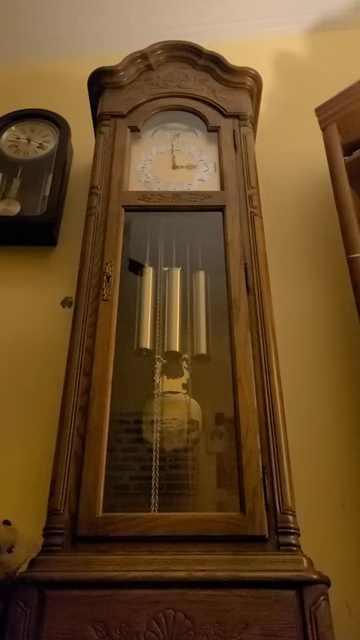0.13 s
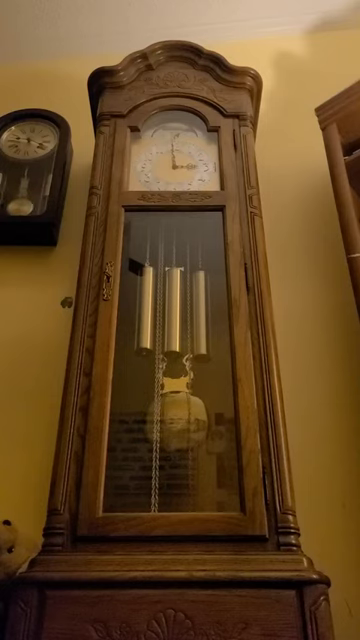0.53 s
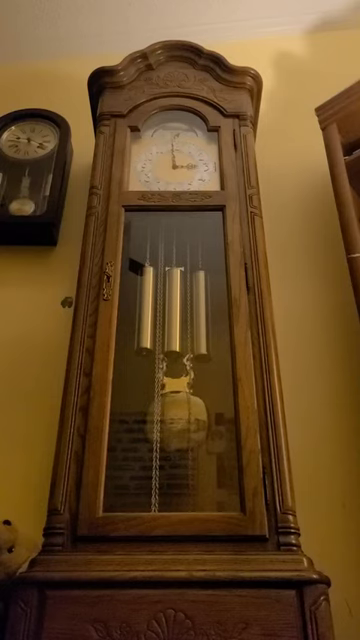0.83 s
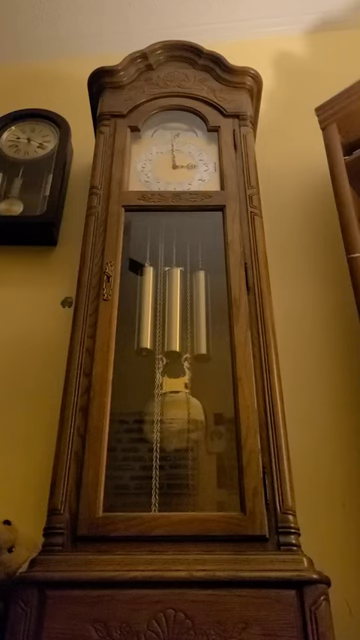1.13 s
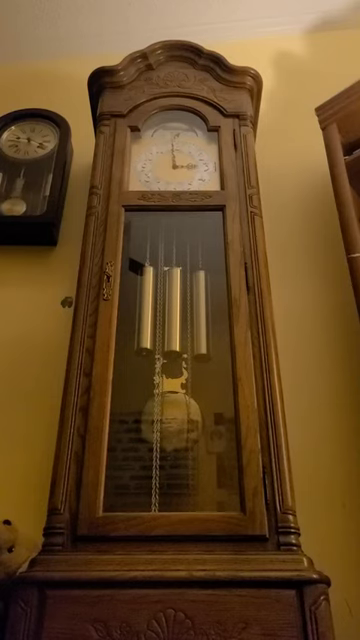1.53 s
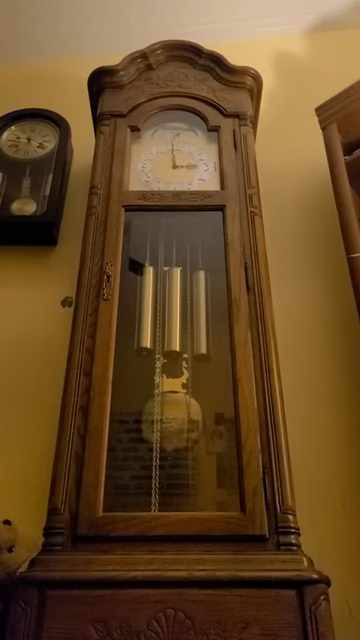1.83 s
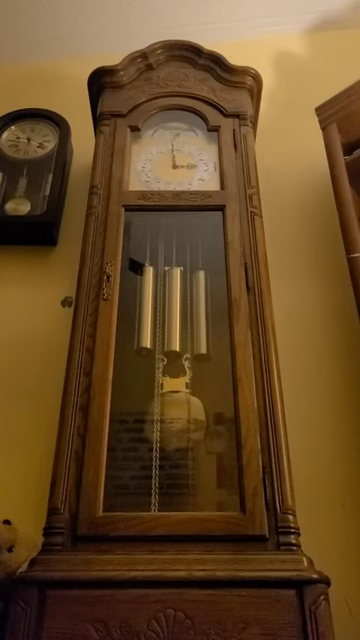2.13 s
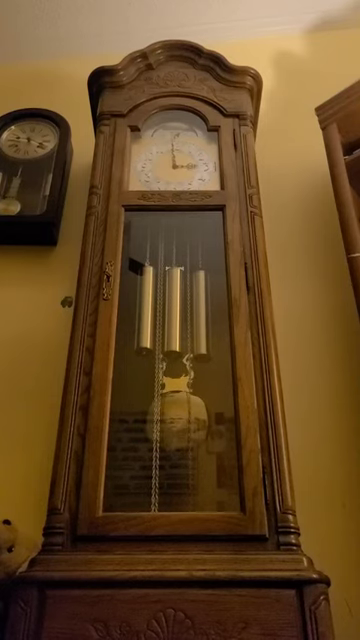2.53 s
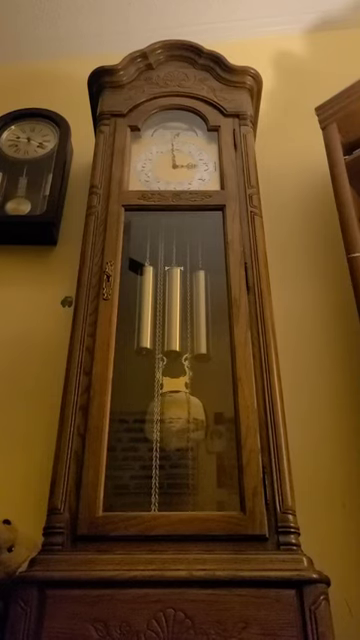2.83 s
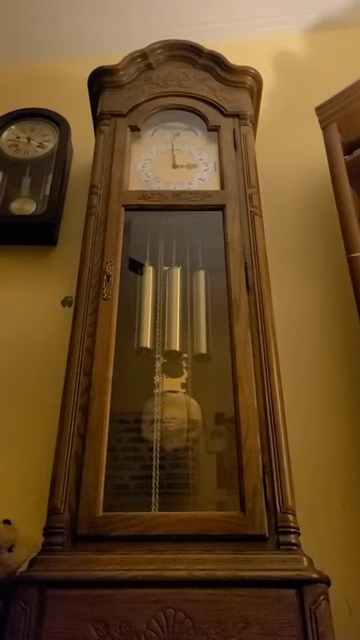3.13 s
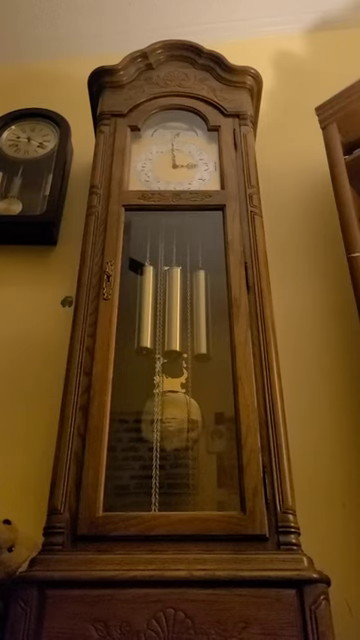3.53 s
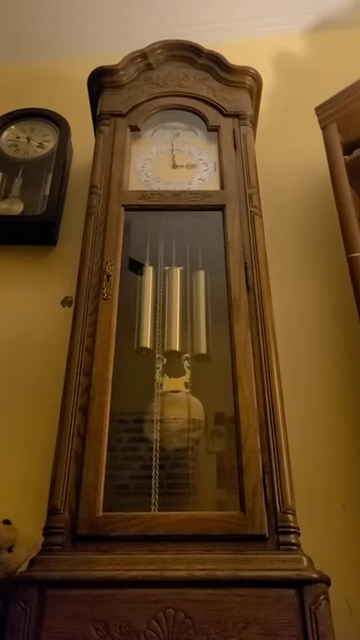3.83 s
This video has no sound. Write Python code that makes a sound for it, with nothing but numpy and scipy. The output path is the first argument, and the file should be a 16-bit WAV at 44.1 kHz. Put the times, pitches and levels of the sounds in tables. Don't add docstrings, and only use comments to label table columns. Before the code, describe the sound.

A longcase clock beats slowly in a quiet living room: ticks at about 0.1, 1.3, 2.5 and 3.65 seconds, tocks at 0.65, 1.85 and 3.0. Each is a crisp woody, brassy clack with short room echo; later ticks ring slightly. Very faint other clocks tick irregularly between. Low ventilation rumble continues. Around 3.25 to 3.46, small dry finger clicks and a soft low thump touch the phone.

```python
import sys
import numpy as np
from scipy import signal
from scipy.fft import rfft, irfft, next_fast_len
from scipy.io import wavfile
from scipy.ndimage import uniform_filter1d

SR = 44100
rng = np.random.default_rng(int(sys.argv[2]) if len(sys.argv) > 2 else 0)


def invert_db(x):
    u = np.asarray(x, float) / 20
    return 10 ** u


def file_out(sig):
    cols = np.atleast_2d(sig).T
    lim = np.clip(cols, -1, 1)
    pcm = np.round(lim * 32767).astype(np.int16)
    wavfile.write(sys.argv[1], SR, pcm)


N = 175077

# [frequency_hz, density_db]
RUMBLE_SPECTRUM = [(11, -20), (18, -11), (107, -5), (184, -16), (337, -22.5), (445, -23.5), (475, -26),
                   (752, -31.5), (900, -39), (1170, -102), (1980, -120)]
HISS_SPECTRUM = [(600, -29), (900, -8.5), (1300, -6.5), (2900, -7.5), (4200, -15), (7600, -24),
                 (12000, -24.5), (15500, -17)]
RUMBLE_DB, HISS_DB = -47.5, -74.5
# [frequency_hz, width_hz, gain_db]
ROOM_RESONANCES = [(47.3, 2.9, 3), (67.7, 13.4, 7.5), (107, 3.5, 7.5), (175, 32, 3.5), (219.9, 3.6, 16),
                   (252, 12, 2.5), (352, 6.2, 7.5), (444.6, 4.1, 6.5), (734, 6.3, 7), (1288, 11, 14)]
# [frequency_hz, likeness_0_to_1]
PORT_LIKENESS = [(130, 0.99), (290, 0.89), (600, 0.5), (1400, 0.047)]
# [frequency_hz, difference_db]
PORT_BALANCE = [(100, -2.5), (220, -1.5), (500, -3.5), (1300, -5.5), (3000, -0.5), (8000, 4)]
# [frequency_hz, lead_rad]
PORT_LEAD = [(130, 0), (300, .25), (500, .4), (800, 1.2)]

# [frequency_hz, t60_s]
ROOM_T60 = [(1000, 0.46), (2000, 0.32), (4000, 0.26), (8000, 0.32), (14000, 0.2)]
ROOM_DB, ROOM_FILL_S, ECHO_LIKENESS = 6, 0.0065, .3
CLOCK_PAN_DB, RIGHT_LAG_SAMPLES = -4.5, 4

# [start_s, level_db, dial_ring_db, panel_ring_db, low_case_db]
BEATS = [
    (.1030, -31.5, -1.5, 1, 2),
    (.6628, -33, -2.5, -0.5, 0),
    (1.2875, -31.5, 7, -3.5, 0.5),
    (1.8442, -33.5, -6, 0, 4.5),
    (2.4700, -31, 5.5, -3, 3),
    (3.0278, -33.5, -17, -3.5, 4),
    (3.6505, -31, 7.5, -5, 3),
]
# [frequency_hz, level_db, t60_s]
TICK_PLATES = [(1911, -5, .1), (2120, -5, .12), (2377, -10, .1), (2525, -9, .1), (2660, -9, .1),
               (2878, -6, .1), (3074, -8, .12), (3138, -9, .1), (3300, -7, .1), (3569, -8, .1),
               (4700, -14, .12), (4940, -20, .1)]
TOCK_PLATES = [(1550, -12, .06), (2008, -5, .1), (2240, -4, .12), (2476, -5, .1), (2640, -5, .1),
               (2799, -4, .1), (2945, -1, .1), (3060, -4, .1), (3265, -6, .1), (3510, -8, .1),
               (3714, -10, .1), (4646, -15, .1)]
PLATES_DB, PLATES_T60_SCALE = -19, .6
# [frequency_hz, width_hz, level_db]
CASE = [(1479, 940, -12), (2097, 580, -8), (2857, 650, 1), (3220, 1100, -0.5), (4900, 1280, -6),
        (5970, 2700, -13.5), (8100, 940, -23.5), (9480, 870, -38), (11600, 2000, -26.5), (13600, 1300, -28),
        (14050, 1400, -29)]
# [frequency_hz, level_db, swell_s, t60_s]
DIAL = [(1596.4, 0, 0.006, 0.25), (1618, -7.5, 0.0046, 0.29), (1590, -13.5, 0.037, 0.43)]
DIAL_NEAR_DB, DIAL_ROOM_DB, DIAL_WOBBLE = 8, -8.5, .3
# [frequency_hz, level_db, swell_s, t60_s]
TICK_PANELS = [(1912, -25.5, 0.0047, 0.11), (2086, -16, 0.037, 0.24), (2605, -20, 0.025, .25),
               (2940, -32, 0.036, 0.33), (2994, -22, 0.0038, 0.44), (3077, -14.5, 0.006, 0.39),
               (3193, -11, 0.02, 0.24), (3340, -19, 0.0043, .27), (3540, -12.5, 0.0029, 0.13),
               (4750, -23.5, 0.0022, .25), (4880, -14, 0.00091, .035)]
TOCK_PANELS = [(1176, -23, 0.034, 0.17), (1557, -17, 0.0025, 0.16), (2018, -27, 0.0062, 0.31),
               (2210, -15, 0.0049, 0.28), (2220, -16.5, 0.02, .28), (2470, -19, 0.024, 0.32),
               (2664, -3, 0.023, .2), (2790, -16, 0.007, 0.32), (2853, -8.5, 0.00085, 0.24),
               (2938, -16.5, 0.0012, 0.36), (3015, -11, 0.0012, 0.3), (3560, -17.5, 0.0045, 0.25),
               (4900, -11.5, 0.0009, 0.026), (4640, -25.5, 0.013, 0.43)]
PANEL_WOBBLE, WOBBLE_S = .85, .008
UNLOCK_S, UNLOCK_DB = .009, -2
RATTLE_S, RATTLE_DB = 0.016, -2
DROP_S, TICK_DROP_DB, TOCK_DROP_DB = .0012, 9, 14
TICK_TOP_DB, TOCK_TOP_DB = 0, 3

# [start_s, level_db]
WALL_KNOCKS = [
    (0.254, -56.5),
    (1.038, -61),
    (1.461, -61),
    (2.256, -56),
    (2.657, -64),
    (3.445, -61.5),
    (3.849, -58.5),
]
# [frequency_hz, level_db, swell_s, t60_s]
WALL_PANELS = [(1175, 5, .002, .06), (1555, 0, .006, .07)]
WALL_LATE_S, WALL_ROOM_DB = .008, -4
# [start_s, level_db, pitch_hz]
MANTEL_BEATS = [
    (0.297, -56.5, 6170),
    (0.607, -47.5, 4550),
    (1.6, -58, 5000),
    (2.289, -61, 6070),
    (3.284, -59, 6050),
    (3.605, -55.5, 4900),
]
# [start_s, level_db]
QUARTZ_STEPS = [
    (0.9541, -57),
    (1.959, -63.5),
    (2.9659, -54.5),
    (3.9604, -56),
]
# [frequency_hz, level_db, t60_s]
QUARTZ_MODES = [(1410, -18, 0.02), (1780, -5, 0.016), (3050, 0.5, 0.005), (4650, -6, 0.013),
                (5870, -16.5, 0.024), (8100, -7.5, 0.004), (11400, -11, 0.0037)]
FAR_DIRECT_DB = -7

# [start_s, level_db, pitch_hz]
THUMPS = [
    (3.249, -50, 182),
    (3.2785, -47, 170),
    (3.402, -49, 169),
    (3.4535, -31.5, 83),
]
THUMP_CYCLES, THUMP_SAG, THUMP_LEFT = 0.82, 0.091, 0.52
# [start_s, level_db, left_minus_right_db, treble_db]
CLICKS = [
    (3.25, -56, -7, 3),
    (3.2522, -46, -13.5, 5),
    (3.28, -43, -10, -0.5),
    (3.4010, -59, -13, -10),
    (3.4475, -63, -18, -2),
    (3.4486, -52.5, -13, 2),
    (3.452, -52, -12, -1),
    (3.4582, -41, -18, 3),
    (3.46, -48.5, -11.5, 7.5),
]
# [frequency_hz, level_db, t60_s]
CLICK_MODES = [(1020, 0, 0.006), (1370, -5.5, 0.0086), (2750, 2.5, 0.0018), (5000, 9, 0.00059),
               (6800, -20, 0.0024), (12000, -5.5, .001)]
# [frequency_hz, level_db, t60_s]
SHELL = [(760, 3, 0.0078), (383, 1, .012)]

# [frequency_hz, width_hz, gain_db]
PORT_DIPS = [(3930, 790, -1.5), (7300, 440, -5), (9500, 1700, -1)]
START_S, FADE_S, TOP_HZ = 0.0922, 0.0021, 15500


def curve(table, hz):
    points = np.array(table)
    return np.interp(np.log(np.maximum(hz, 1)), np.log(points[:, 0]), points[:, 1])


def add(track, sound, s):
    i = int(s * SR)
    track[..., i:i + sound.shape[-1]] += sound[..., :track.shape[-1] - i]


def band(x, hz, width):
    b, a = signal.iirpeak(hz, hz / width, fs=SR)
    return signal.lfilter(b, a, signal.lfilter(b, a, x))


def walk(rate):
    k = int(SR / rate)
    held = np.repeat(rng.standard_normal(N // k + 1), k)
    return 1.8 * uniform_filter1d(uniform_filter1d(held, k), k)[:N]


def ventilation(shape, db, resonances, swell_db, flicker_db):
    size = next_fast_len(N)
    f = np.arange(size // 2 + 1) * SR / size
    boost = sum((invert_db(d) - 1) / (1 + ((f - hz) / w * 2) ** 2) for hz, w, d in resonances)
    gain = invert_db(curve(shape, f)) * (1 + boost)
    alike = np.clip(curve(PORT_LIKENESS, f), 0, 1)
    sign = np.array([[1], [-1]])
    mid, side = rfft(rng.standard_normal((2, size)))
    both = gain * (mid * np.sqrt(1 + alike) + sign * side * np.sqrt(1 - alike))
    both = both * invert_db(sign * curve(PORT_BALANCE, f) / 2) * np.exp(.5j * sign * curve(PORT_LEAD, f))
    out, swell = 0, walk(2.44)
    for hz in 20 * 2 ** np.arange(10):
        octaves_away = np.clip(np.log2(np.maximum(f, 1) / hz), -1, 1)
        share = np.cos(np.pi / 2 * octaves_away) ** 2
        if np.any(share * gain > 1e-4):
            level = invert_db(swell_db * swell + flicker_db * walk(5.706))
            out = out + irfft(both * share, size)[:, :N] * level
    return out * invert_db(db) / np.sqrt(np.mean(out.mean(axis=0) ** 2))


def room(x):
    t, echo = np.arange(SR // 2) / SR, 0
    mid, side = rng.standard_normal((2, len(t)))
    sign = np.array([[1], [-1]])
    air = np.sqrt(1 + ECHO_LIKENESS) * mid + np.sqrt(1 - ECHO_LIKENESS) * side * sign
    for k, hz in enumerate(700 * 2 ** np.arange(0, 4.6, .5)):
        decay = 1000. ** (-t / curve(ROOM_T60, hz))
        echo = echo + (-1) ** k * band(air, hz, hz / 2) * decay
    echo = echo * (1 - np.exp(-t / ROOM_FILL_S))
    return signal.fftconvolve(x[None], echo / np.sqrt(np.sum(echo ** 2) / 2), axes=1)


def ring(modes, scatter_db=2, size=13230):
    hz, db, t60 = np.array(modes, float).T[:, :, None]
    level_luck, pitch_luck = rng.standard_normal((2, len(modes), 1))
    t = np.arange(size) / SR
    sines = np.sin(2 * np.pi * hz * (1 + 0.0026 * pitch_luck) * t)
    return np.sum(invert_db(db + scatter_db * level_luck) * sines * 1000. ** (-t / t60), axis=0)


def panels(table, wobble=PANEL_WOBBLE):
    hz, db, swell, t60 = np.array(table, float).T[:, :, None]
    t, k = np.arange(13230) / SR, int(WOBBLE_S * SR)
    luck = rng.standard_normal((2, 2, len(table), len(t)))
    waver = uniform_filter1d(uniform_filter1d(luck, k), k) * np.sqrt(.75 * k)
    carrier = (1 + wobble * (waver[0] + 1j * waver[1])) * np.exp(2j * np.pi * hz * t)
    envelope = (1 - np.exp(-t / np.abs(swell))) * 1000. ** (-t / t60)
    return np.sum(invert_db(db) * envelope * carrier.imag, axis=1)


def case_filter(impacts, low_db, top_db):
    out = 0
    for hz, width, db in CASE:
        gain = invert_db(db + low_db * (hz < 2500) + top_db * (hz > 9000)) / np.sqrt(width / 1000)
        out = out + gain * band(band(impacts, hz, width), hz, width)
    return out


def longcase():
    out, t = np.zeros((2, N)), np.arange(13230) / SR
    sides = [(TICK_PLATES, TICK_PANELS, TICK_DROP_DB, TICK_TOP_DB),
             (TOCK_PLATES, TOCK_PANELS, TOCK_DROP_DB, TOCK_TOP_DB)]
    for k, (s, db, dial_db, panel_db, low_db) in enumerate(BEATS):
        plate_modes, panel_modes, drop_db, top_db = sides[k % 2]
        chatter_db = 4.16 * np.repeat(rng.standard_normal(90), 147)
        rattle = rng.standard_normal(len(t)) * invert_db(RATTLE_DB + chatter_db) * np.exp(-t / RATTLE_S)
        drop = np.sign(rng.standard_normal(len(t))) * invert_db(drop_db) * np.exp(-t / DROP_S)
        rattle, drop = case_filter(np.array([rattle, drop]), low_db, top_db)
        dial = invert_db(PLATES_DB + dial_db) * panels(DIAL, DIAL_WOBBLE)
        plates = ring(np.array(plate_modes) * [1, 1, PLATES_T60_SCALE]) * (1 - np.exp(-t / .0005))
        scrape = rng.standard_normal(len(t)) * (t < UNLOCK_S) * t / UNLOCK_S
        beat = invert_db(UNLOCK_DB) * band(scrape, 2900, 900)
        add(beat, rattle + invert_db(PLATES_DB) * plates + invert_db(DIAL_ROOM_DB) * dial[0], UNLOCK_S)
        roomy = np.pad(beat, (0, SR // 2 - 1)) + invert_db(ROOM_DB) * room(beat)
        add(out, invert_db(db) * roomy, s - UNLOCK_S)
        direct = drop + invert_db(DIAL_NEAR_DB) * dial + invert_db(panel_db) * panels(panel_modes)
        add(out, invert_db(db) * direct, s)
    return out


def wall_clock():
    out = np.zeros((2, N))
    for s, db in WALL_KNOCKS:
        for k, mode in enumerate(WALL_PANELS):
            knock = invert_db(db) * panels([mode])
            add(out, knock, s + k * WALL_LATE_S)
            add(out, invert_db(WALL_ROOM_DB) * room(knock[0]), s + k * WALL_LATE_S)
    return out


def mantel_clock():
    out, t = np.zeros(N), np.arange(4410) / SR
    for s, db, hz in MANTEL_BEATS:
        burst = rng.standard_normal(len(t)) * np.exp(-t / 0.019)
        add(out, invert_db(db) * band(burst, hz, 700), s)
    return out


def quartz_clock():
    out = np.zeros(N)
    for s, db in QUARTZ_STEPS:
        add(out, invert_db(db + 3.5) * ring(QUARTZ_MODES), s)
    return out


def thumps():
    out = np.zeros((2, N))
    for s, db, hz in THUMPS:
        turns = np.arange(4410) / SR * hz
        envelope = turns / THUMP_CYCLES * np.exp(1 - turns / THUMP_CYCLES)
        push = -np.sin(2 * np.pi * turns / (1 + THUMP_SAG * turns)) * envelope
        add(out, invert_db(db) * push * np.array([[THUMP_LEFT], [THUMP_LEFT - 2]]), s)
    return out


def finger_clicks():
    out, t = np.zeros((2, N)), np.arange(1323) / SR
    for s, db, pan_db, treble_db in CLICKS:
        modes = [(hz, d + treble_db * (hz > 2000), t60) for hz, d, t60 in CLICK_MODES]
        click = ring(modes, 0.67, size=1323) * (1 - np.exp(-t / .0001))
        creak = invert_db(treble_db - 26.5) * band(rng.standard_normal(len(t)), 4500, 5900) * np.exp(-t / 0.014)
        add(out, invert_db(db + pan_db * np.array([[.5], [-.5]])) * (click + creak), s)
        shell = ring(SHELL, 2.2, size=1323) * np.array([[-.5], [1]])
        add(out, invert_db(db - treble_db / 2 + 4.5) * shell, s)
    return out


def scene():
    rumble = ventilation(RUMBLE_SPECTRUM, RUMBLE_DB, ROOM_RESONANCES, .3, .8)
    hiss = ventilation(HISS_SPECTRUM, HISS_DB, ROOM_RESONANCES[-1:], 0.43, 0.69)
    clocks = longcase() + wall_clock()
    far = mantel_clock() + quartz_clock()
    clocks = clocks + invert_db(FAR_DIRECT_DB) * far + room(far)[:, :N]
    clocks = clocks * invert_db(CLOCK_PAN_DB * np.array([[.5], [-.5]]))
    clocks[1] = np.roll(clocks[1], RIGHT_LAG_SAMPLES)
    return clocks + thumps() + finger_clicks() + rumble + hiss


def roll_off(x):
    return signal.sosfilt(signal.butter(12, 15970, fs=SR, output="sos"), x)


def record(dry):
    for hz, width, db in PORT_DIPS:
        dry = dry - (1 - invert_db(db)) * band(dry, hz, width)
    low_pass = signal.ellip(8, .2, 60, TOP_HZ, fs=SR, output="sos")
    dry = signal.sosfilt(low_pass, dry)
    fade = np.clip((np.arange(N) / SR - START_S) / FADE_S, 0, 1)
    return roll_off(dry * fade)


dry = scene()
out = record(dry)
file_out(out)
```